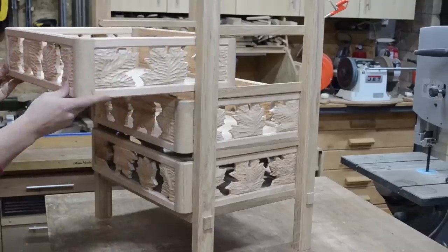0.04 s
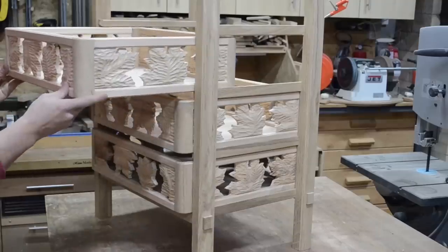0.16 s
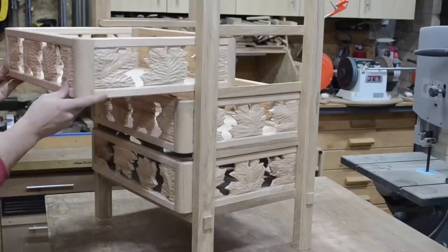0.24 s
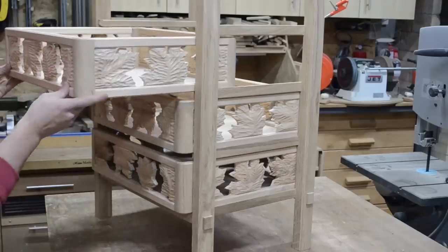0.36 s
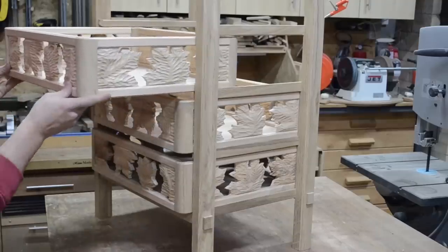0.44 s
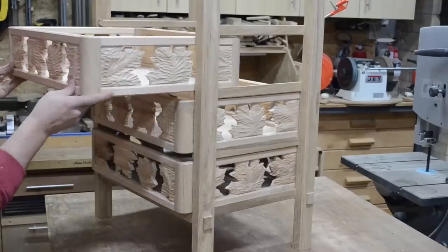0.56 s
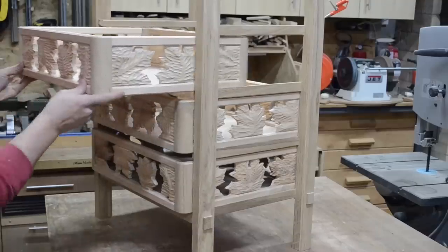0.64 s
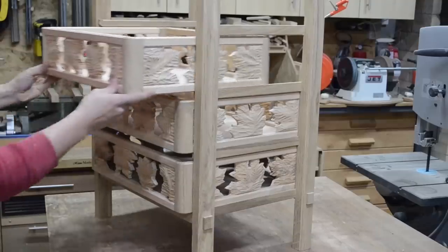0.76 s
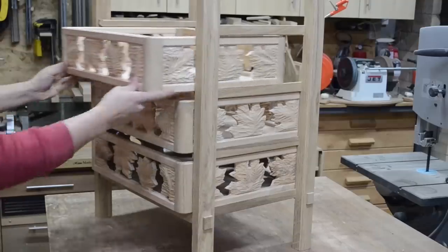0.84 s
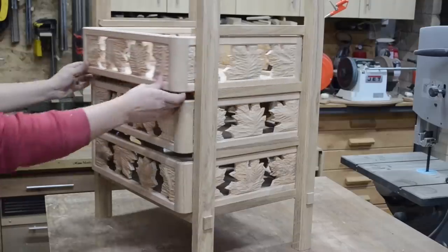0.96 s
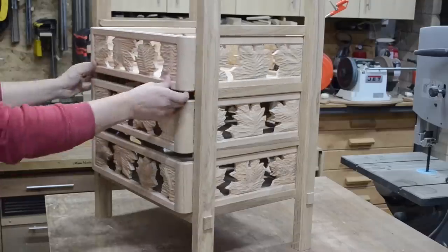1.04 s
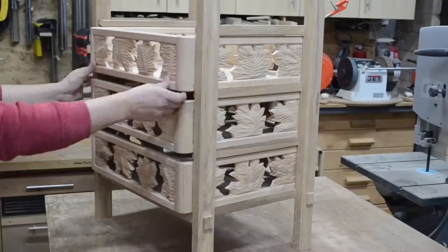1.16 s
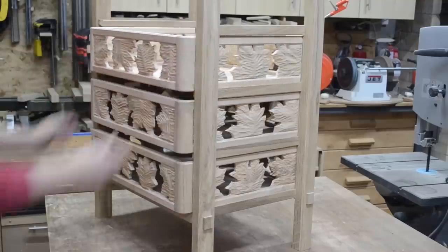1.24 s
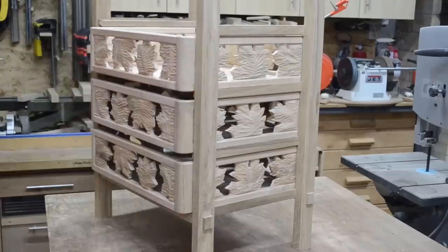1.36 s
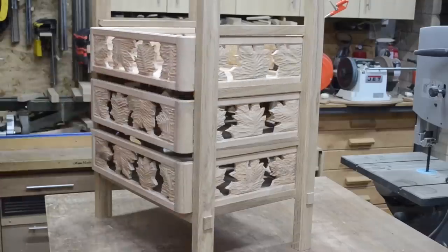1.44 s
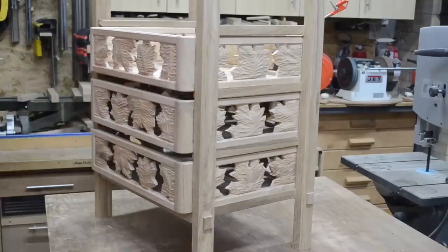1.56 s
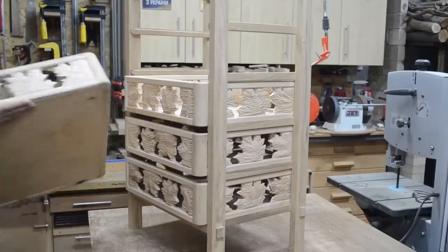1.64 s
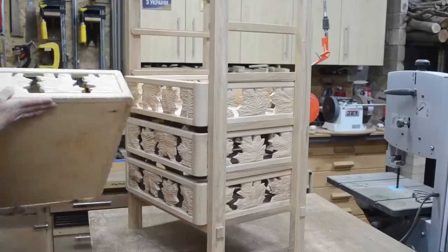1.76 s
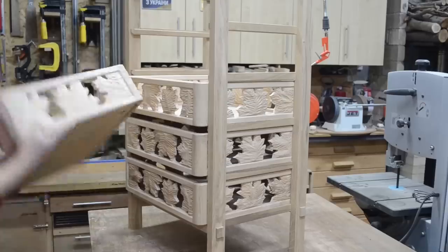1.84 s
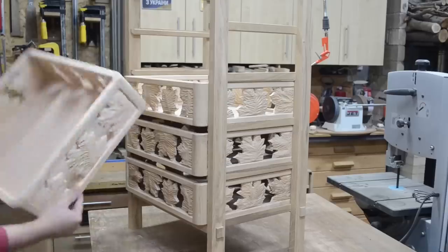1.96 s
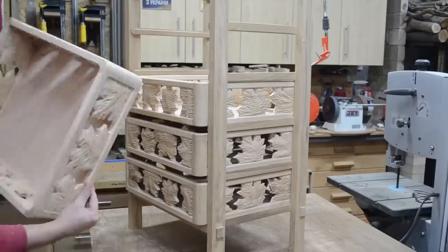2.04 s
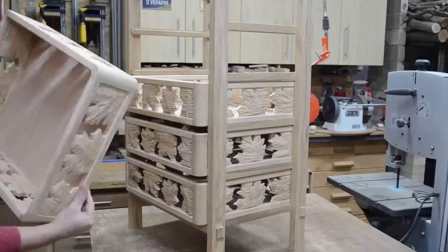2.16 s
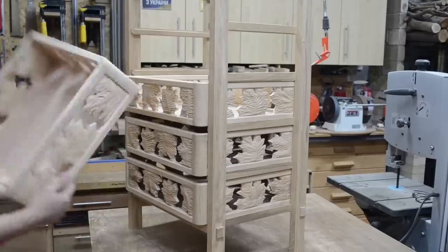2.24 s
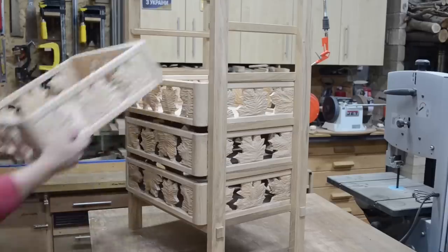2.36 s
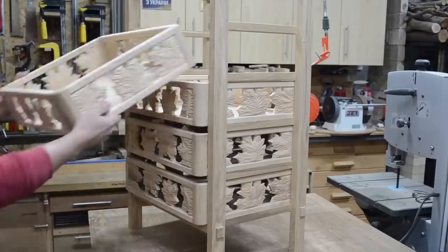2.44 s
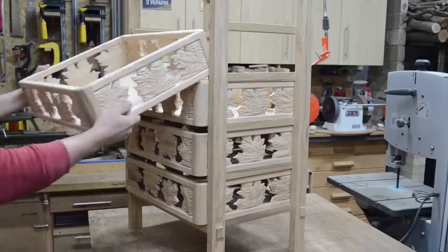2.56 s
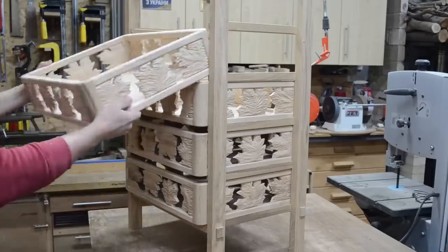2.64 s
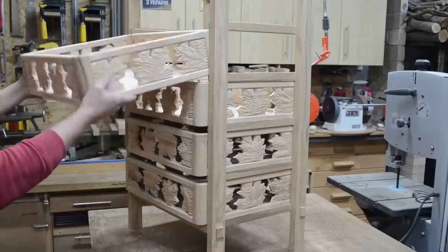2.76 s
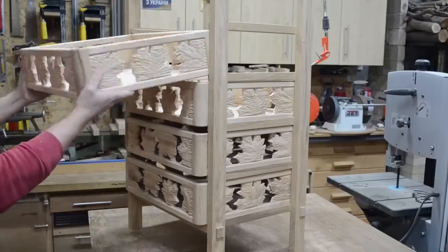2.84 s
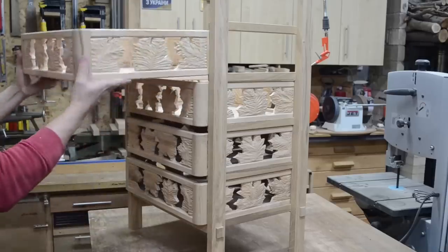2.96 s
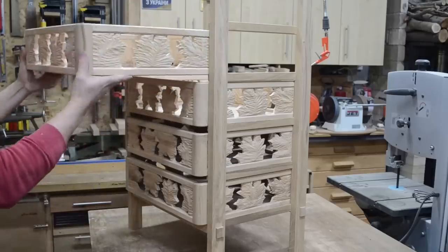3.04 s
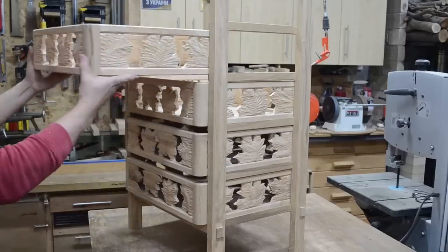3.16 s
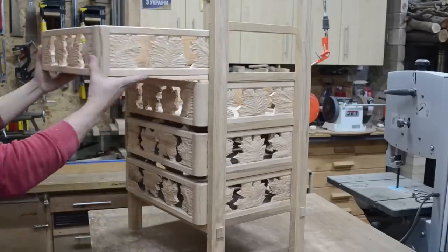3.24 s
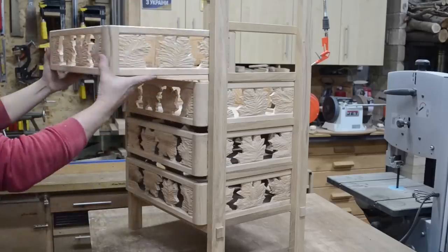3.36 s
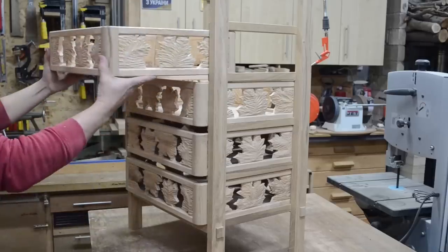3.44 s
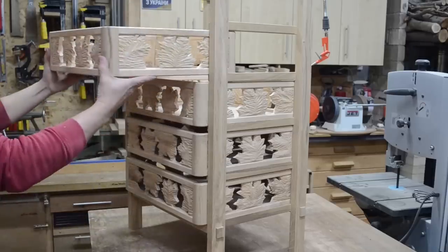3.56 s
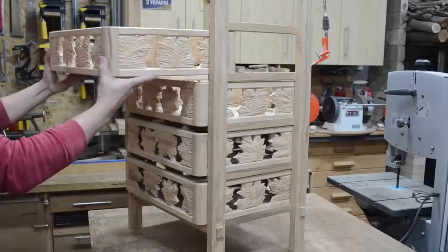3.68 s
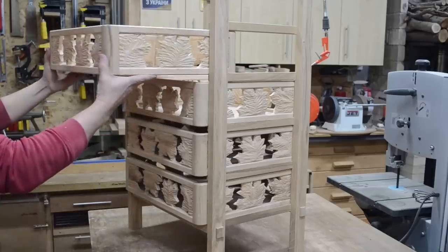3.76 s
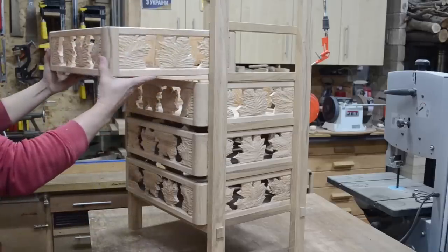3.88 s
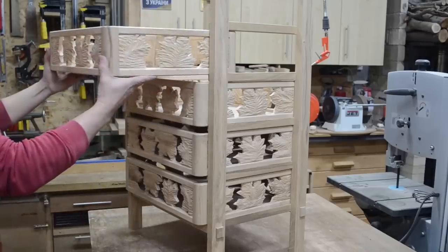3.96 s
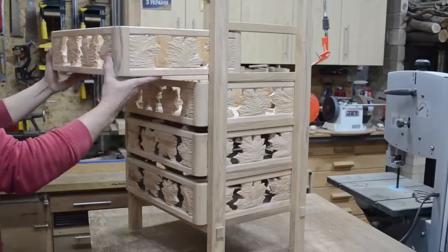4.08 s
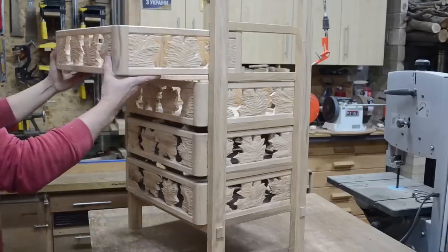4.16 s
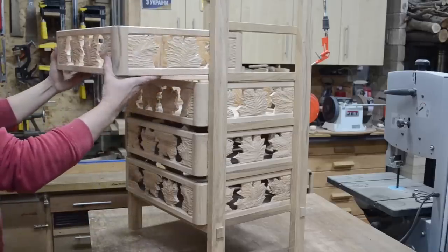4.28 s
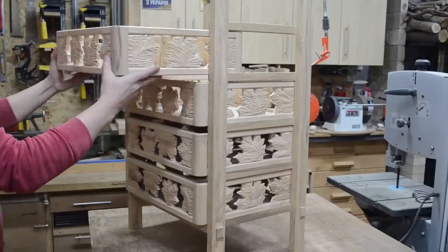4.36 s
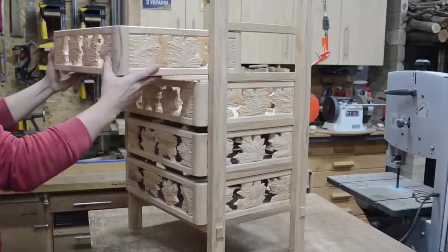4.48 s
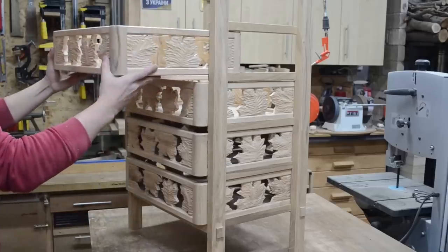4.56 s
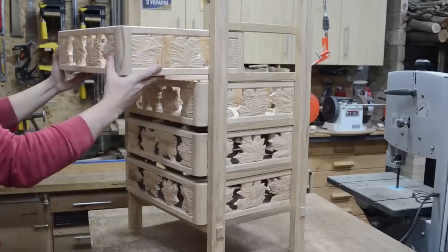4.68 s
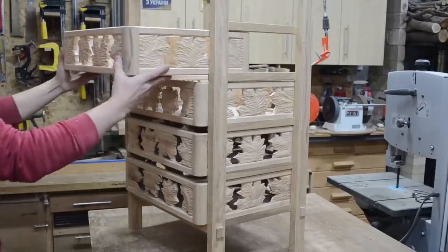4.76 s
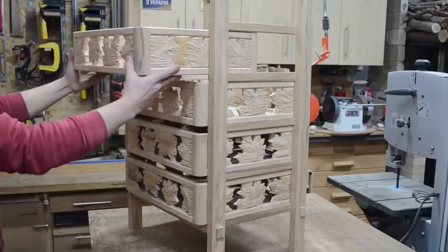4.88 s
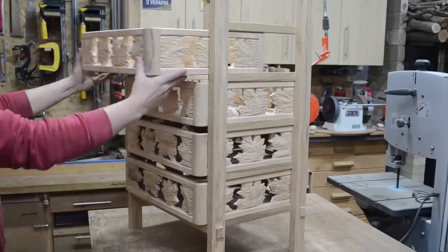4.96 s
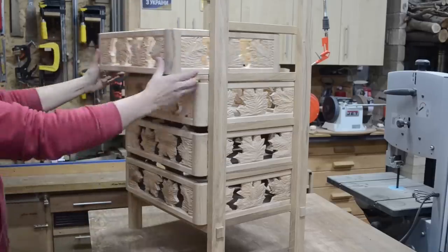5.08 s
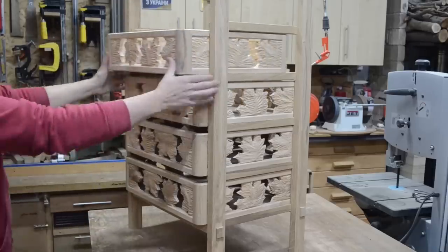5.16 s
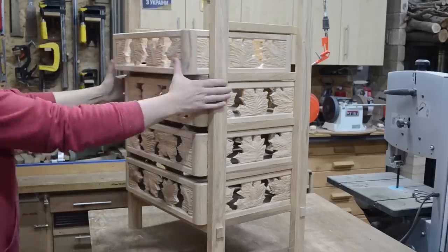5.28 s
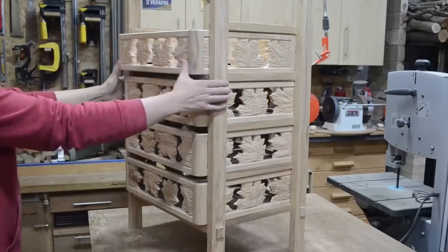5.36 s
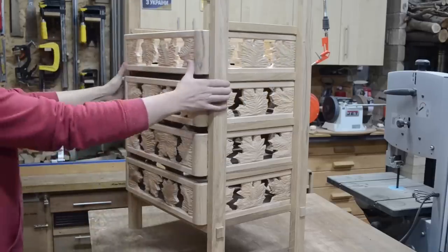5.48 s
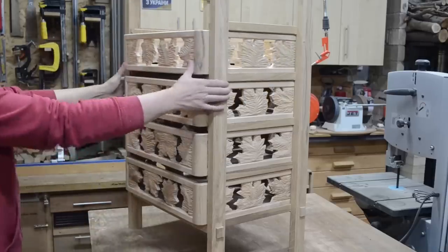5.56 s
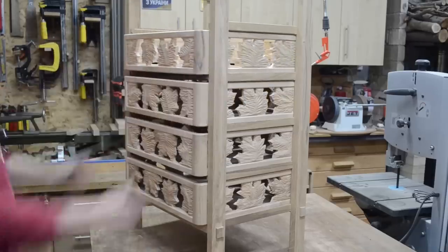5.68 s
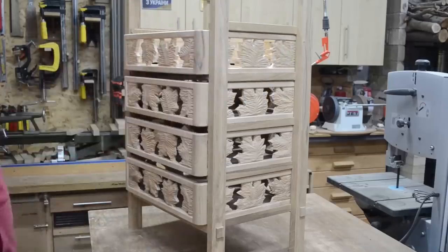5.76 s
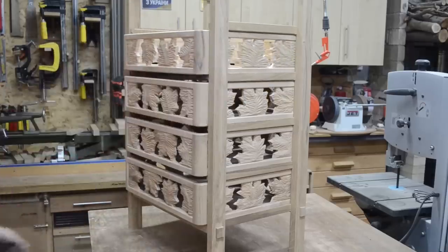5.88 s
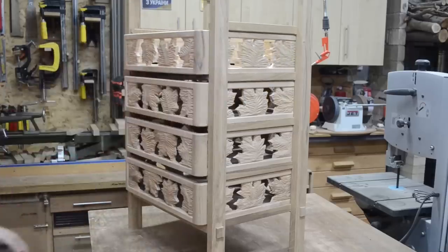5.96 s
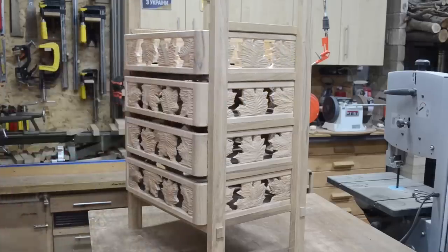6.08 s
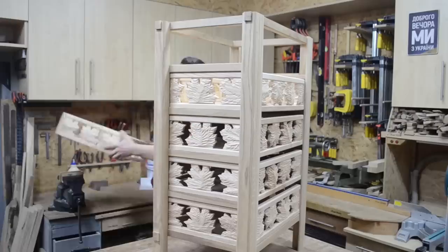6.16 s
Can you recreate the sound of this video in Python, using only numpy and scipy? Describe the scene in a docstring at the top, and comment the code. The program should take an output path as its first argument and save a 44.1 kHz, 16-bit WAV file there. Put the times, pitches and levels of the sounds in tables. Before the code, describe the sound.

In a small cluttered workshop, a light wooden drawer taps its frame, then slides in with a dry, juddering rasp and brief squeals, ending in a cluster of hollow knocks and a clack. Hands brush wood; a second drawer bumps onto the runners, scrapes, knocks, then slides harder and claps shut. Close microphone, short dull reverberation, faint steady room noise.

```python
"""In a small, cluttered workshop, two carved wooden drawers are set on the runners of a wooden frame and pushed home.
Stick-slip friction, as noise shaped by the sliding speed, makes the rasp, judder, hiss and brief squeals.
Impacts excite damped modes and a dense ring: knocks of drawer and frame, thuds, end-stop clacks, dying bounces.
Hands and sleeves brush the wood as short swells of noise; a quiet, slightly wavering room noise lies beneath."""
import sys
import numpy as np
from scipy import signal
from scipy.fft import rfft, irfft, next_fast_len
from scipy.io import wavfile

SR = 44100
rng = np.random.default_rng(int(sys.argv[2]) if len(sys.argv) > 2 else 0)


def to_wav(sig):
    """Store sig (one row per channel, or 1-D mono) as 16-bit WAV at the path in sys.argv[1].

    Samples outside -1..1 are clipped; the rate is SR.
    """
    pcm = np.clip(np.atleast_2d(sig), -1, 1) * 32767
    pcm = np.round(pcm).astype(np.int16)
    wavfile.write(sys.argv[1], SR, pcm.T)  # frames by channels


N = 274566
TIME = np.arange(N) / SR
RING_TIME = TIME[:SR // 3]  # time since a blow [s]

# Pushes along the runners, levels at full speed: (start [s], speed-up [s], hold [s], slow-down [s],
# rasp level [dB], judder level [dB], hiss level [dB], judder cut-off [Hz])
PUSHES = [(0.653, 0.23, 0.12, 0.19, -47, -48, -61.5, 170),
          (1.125, 0.008, 0.023, 0.012, -48.5, -50, -86, 200),
          (3.106, 0.23, 0.097, 0.027, -52, -55.5, -71.5, 272),
          (4.686, 0.42, 0.16, 0.094, -46, -50, -65.5, 274),
          (5.419, 0.021, 0.086, 0.017, -46, -49.5, -65.5, 274)]
# Rasp spectra, A for the first drawer, B and C for the second: (frequency [Hz], level [dB])
RASP_A = [(350, -9), (620, 1), (900, -0.5), (1100, 1), (1400, 0.5), (1850, -2.5), (2200, -7.5),
          (3000, -10.5), (3700, -18.5), (4400, -20.5), (6000, -26.5), (12000, -61)]
RASP_B = [(300, 1), (600, 3.5), (1000, -2.5), (1500, 1.5), (2000, -7), (2800, -10.5), (3700, -23),
          (5500, -35), (12000, -60)]
RASP_C = [(300, -1), (580, 1.5), (900, 0), (1250, 2.5), (1550, 1), (1900, -5), (2800, -12), (3700, -19.5),
          (5500, -31), (12000, -56)]
# Spectrum of the sliding hiss: (frequency [Hz], level [dB])
SLIDE_HISS = [(2500, 2.5), (4500, -5.5), (7000, -10), (10500, -10.5), (12500, -19), (15000, -31)]
# Gliding squeals of the first drawer:
# (middle [s], half length [s], pitch at the middle [Hz], glide [Hz/s], level [dB])
SQUEALS = [(0.79, 0.073, 1765, -500, -50.5), (0.806, 0.048, 777, -100, -46.5),
           (0.856, 0.035, 973, 2999.5, -50), (0.929, 0.11, 1448, -2000, -55),
           (0.975, 0.047, 928, -1500, -48)]
# Knocks of drawer on frame: (time [s], level [dB], contact cut-off [Hz], first frame thud re box [dB],
# first end-stop clack re box [dB], ring favoured by the struck spot [Hz])
KNOCKS = [(0.05, -54.5, 580, 0, -31, 315), (0.262, -67.5, 410, 4, -30, 260),
          (0.536, -46, 457, -7, -14, 209), (0.962, -39, 297, -6, -25, 184),
          (1.005, -39.5, 350, -8, -18, 302), (1.053, -34, 328, -10, -36, 304),
          (1.079, -39, 350, -11, -21, 250), (1.139, -35.5, 486, -3.5, -0.5, 181),
          (1.856, -51.5, 695, -13, -12, 273), (2.65, -33, 656, -2, -22, 550),
          (2.657, -33, 790, -7, -18, 440), (2.668, -33.5, 517, -12, -34, 305),
          (2.807, -47, 260, -2.5, -28, 183), (3.866, -60, 202, -6, -15, 186),
          (3.976, -53, 382, -2.5, -20, 320), (4.106, -43, 716, 3.5, -4, 348),
          (4.111, -31, 780, -12, -16.5, 650), (4.118, -33.5, 710, -21, -17.5, 236),
          (4.265, -37, 1010, -40, -26, 1000), (4.272, -42.5, 610, -6.5, -12, 354),
          (4.515, -39, 454, -9.5, -22.5, 454), (5.061, -41, 272, -6, -23, 230),
          (5.516, -39.5, 600, -25, 8, 670), (5.522, -37.5, 597, -3, -5.5, 670),
          (5.55, -34.5, 447, -13, -29, 308)]
# Modes of the drawer box: (frequency [Hz], relative level [dB], t60 [s])
BOX_MODES = [(186, 0, .19), (208, -6, .15), (231, 0, .17), (255, -3, .17), (281, -2, .15), (301, -3, .25),
             (350, -1, .16), (422, -4, .14), (458, -6, .14), (488, -2, .17), (519, -2, .17), (548, -6, .16),
             (585, -7, .13), (619, -3, .16), (680, -7, .14), (718, -6, .15), (756, -7, .14),
             (916, -10, .13), (959, -8, .13), (1010, -9, .11), (1070, -10, .11)]
# Low modes of the frame on its table: (frequency [Hz], relative level [dB], t60 [s])
FRAME_MODES = [(53.6, -16, 0.33), (69.6, -10, 0.32), (92.5, -3.5, 0.24), (111, 2, 0.14), (143.1, 3.5, 0.23)]
# Modes of the end stop and rails: (frequency [Hz], relative level [dB], t60 [s])
STOP_MODES = [(1180, -8, .15), (1291, -7, .15), (1372, 0, .16), (1420, -7, .14), (1473, 0, .16),
              (1560, -8, .14), (1776, -16, .15), (1993, -12, .14), (2370, -16, .14)]
# Dense ring of many weak modes and room reflections: (frequency [Hz], level [dB])
BOX_WASH = [(70, -30), (130, -3), (220, -5), (550, -5.5), (850, -10), (1300, -9.5), (2500, -26),
            (5000, -22), (12000, -28)]
STOP_WASH = [(300, -20), (800, -9.5), (1150, 0), (1420, 6), (1800, -5.5), (2400, -9), (3200, -20.5),
             (4000, -26.5), (5500, -44), (12000, -52.5)]
# Decay of the dense ring: (frequency [Hz], t60 [s])
WASH_T60 = [(80, 0.31), (250, 0.25), (600, 0.21), (1400, 0.15), (4000, 0.16), (12000, 0.044)]
# Hands and sleeves on wood: (middle [s], level [dB], half length [s], treble weight [dB])
BRUSHES = [(0.113, -65, 0.023, 10), (1.315, -68.5, 0.094, 2), (1.728, -60.5, 0.064, 0.5),
           (1.8, -57, 0.015, 6), (1.873, -44, 0.009, -1), (1.99, -49, 0.029, 2.5),
           (2.048, -42.5, 0.013, -2.5), (2.373, -64.5, 0.1, 1), (2.652, -60, 0.036, 0),
           (2.826, -59.5, 0.077, -0.5), (3.018, -57.5, 0.029, -11), (4.148, -54, 0.042, -2.5),
           (4.26, -51.5, 0.02, -8.5), (4.422, -60.5, 0.038, -1), (5.695, -61, 0.025, 3),
           (6.202, -61.5, 0.16, -2)]
# Spectrum of the soft rub: (frequency [Hz], level [dB])
RUB_SPECTRUM = [(150, -1), (400, 5.5), (900, 4), (1500, 4.5), (2500, -2.5), (4500, -18), (8000, -42)]
# Spectrum of the room noise: (frequency [Hz], level [dB])
ROOM_SPECTRUM = [(20, -7), (50, 0.5), (100, 0.5), (200, 1.5), (400, 0.5), (800, 2), (1600, -2),
                 (2500, -7.5), (4000, -16.5), (6300, -24.5), (10000, -26.5), (11900, -30), (12600, -48)]

# Share of full speed at which the wood breaks free or grips again, and how long that takes [s]
CREEP_SPEED, GRIP_S = 0.22, 0.013
EASE_POWER = 1.63  # above 1, the drawer picks up speed gently at first
JUDDER_POWER, HISS_POWER = 0.98, 1.14  # powers of speed; rasp is proportional to speed
SQUEAL_WIDTH_HZ = 117
# First bounce gap [s], ratio of each gap to the one before, level change per bounce [dB]
BOUNCE_S, BOUNCE_GAP_SHARE, BOUNCE_LOSS_DB = 0.024, 0.87, -12
BOUNCE_THUD_DB, BOUNCE_CLACK_DB = 2.5, -6.5  # change in thud and clack shares per bounce
ROOM_DB = -63
TOP_HZ, OFFSET = 14800, 0.0006  # upper band limit [Hz], constant offset (full scale = 1)


def push(row, rasp_spectrum):
    """Stick-slip friction: fine slips rasp and hiss, coarse slips shake the box; all follow the speed."""
    *timing, rasp_db, judder_db, hiss_db, judder_hz = row
    speed = speed_of(*timing)

    grip = undb(0.44 * walk(40))  # the grain grips unevenly
    fine = slips(per_s=6000, scatter_db=-1.0) * grip
    rasp = colour(fine, rasp_spectrum) * speed
    hiss = colour(rng.standard_normal(N), SLIDE_HISS) * speed ** HISS_POWER

    body = ring(BOX_MODES)
    body = body + undb(-2.5) * ring(FRAME_MODES)
    body = body + undb(6.5) * wash(BOX_WASH, build_s=0.0078)
    shaken = through(slips(per_s=390, scatter_db=7.5), body)
    judder = unit(low_pass(shaken, judder_hz)) * speed ** JUDDER_POWER

    return undb(rasp_db) * rasp + undb(judder_db) * judder + undb(hiss_db) * hiss


def speed_of(start, rise_s, hold_s, fall_s):
    """Static and sliding friction: break free, speed up, run evenly, slow, grip again (1 = full speed)."""
    times = start - GRIP_S + np.cumsum([0, GRIP_S, rise_s, hold_s, fall_s, GRIP_S])
    creep = CREEP_SPEED ** (1 / EASE_POWER)
    return np.interp(TIME, times, [0, creep, 1, 1, creep, 0]) ** EASE_POWER


def slips(per_s, scatter_db):
    """Stick-slip at fibre scale: wood fibres catch and let go in random tiny impulses of uneven size."""
    happens = rng.random(N) < per_s / SR
    unevenness = undb(scatter_db * rng.standard_normal(N))
    return unit(happens * rng.standard_normal(N) * unevenness)


def squeal(s, half_s, hz, glide_hz_per_s, db):
    """Friction-driven resonance: a narrow band whose pitch glides as the point of contact moves."""
    phase = 2 * np.pi * np.cumsum(hz + glide_hz_per_s * (TIME - s)) / SR
    # slow noise on two quadrature carriers makes a band centred on the gliding pitch
    slipping = low_pass(rng.standard_normal((2, N)), SQUEAL_WIDTH_HZ / 2)
    tone = unit(slipping[0] * np.cos(phase) + slipping[1] * np.sin(phase))
    return undb(db) * tone * swell(s, half_s)


def knocks(bounces=2):
    """Energy loss in repeated impact: after each blow the bounces come sooner and weaker."""
    out = np.zeros(N)
    for s, db, contact_hz, thud_db, clack_db, spot_hz in KNOCKS:
        for k in range(bounces + 1):
            bounce_thud_db = thud_db + k * BOUNCE_THUD_DB
            bounce_clack_db = clack_db + k * BOUNCE_CLACK_DB
            sound = blow(contact_hz, bounce_thud_db, bounce_clack_db, spot_hz)
            add(out, s, undb(db + k * BOUNCE_LOSS_DB) * sound)
            s += BOUNCE_S * BOUNCE_GAP_SHARE ** k
    return out


def blow(contact_hz, thud_db, clack_db, spot_hz):
    """Impact excitation: softer contact dulls the box ring; the frame thuds and the hard stop clacks."""
    modes = favour(BOX_MODES, spot_hz, boost_db=7.5, width_octaves=0.12)
    box = ring(modes) + undb(-5.5) * wash(BOX_WASH, build_s=0.0036)
    box = box * (1 - np.exp(-RING_TIME / 0.0036))  # the ring spreads through the joints
    box = box + undb(5) * crack(BOX_WASH, length_s=0.0046)
    box = unit_hit(low_pass(box, contact_hz))

    thud = ring(FRAME_MODES) * (1 - np.exp(-RING_TIME / 0.0097))  # the heavy frame builds up later

    clack = ring(STOP_MODES) + undb(7.5) * wash(STOP_WASH, build_s=0.0026)
    clack = unit_hit(clack + undb(10) * crack(STOP_WASH, length_s=0.0038))
    return box + undb(thud_db) * thud + undb(clack_db) * clack


def favour(modes, centre_hz, boost_db, width_octaves):
    """Modal coupling: a blow drives hardest the modes that move most at the struck spot."""
    favoured = []
    for hz, db, t60 in modes:
        octaves_away = np.log2(hz / centre_hz)
        boost = boost_db * np.exp(-(octaves_away / width_octaves) ** 2)
        favoured.append((hz, db + boost, t60))
    return favoured


def ring(modes):
    """Modal superposition: a struck body sounds as a sum of damped sine modes."""
    total = np.zeros(len(RING_TIME))
    for k, (hz, db, t60) in enumerate(modes):
        sign = (-1) ** k  # neighbouring modes move in opposite phase
        total += sign * undb(db) * fade(t60) * np.sin(2 * np.pi * hz * RING_TIME)
    return unit_hit(total)


def wash(spectrum, build_s):
    """High modal density: a noise-like ring builds up quickly and decays at a rate set by frequency."""
    bins = rfft(colour(rng.standard_normal(len(RING_TIME)), spectrum))
    hz = np.fft.rfftfreq(len(RING_TIME), 1 / SR)
    centres, t60s = np.transpose(WASH_T60)
    tail = np.zeros(len(RING_TIME))
    for share, t60 in zip(np.eye(len(centres)), t60s):
        # overlapping bands, each rising from 0 to 1 at its own centre
        weight = at_hz(np.c_[centres, share], hz)
        tail += irfft(bins * weight, len(RING_TIME)) * fade(t60)
    return unit_hit(tail * (1 - np.exp(-RING_TIME / build_s)))


def crack(spectrum, length_s):
    """Direct radiation: the first few milliseconds reach the ear straight from the contact."""
    pulse = (RING_TIME / length_s) * np.exp(1 - RING_TIME / length_s)
    return colour(rng.standard_normal(len(RING_TIME)), spectrum) * pulse


def fade(t60):
    """Damping: decay of 60 dB in t60 seconds, held up at first by early reflections."""
    return np.exp(-np.log(1000) * (RING_TIME / t60) ** 1.35)


def brushes():
    """Light surface friction: skin and cloth sweep the wood in short swells of soft rub and fine hiss."""
    rub_gain, hiss_gain = np.zeros(N), np.zeros(N)
    for s, db, half_s, treble_db in BRUSHES:
        sweep = undb(db) * swell(s, half_s)
        rub_gain += sweep
        hiss_gain += sweep * undb(treble_db)
    rub = rub_gain * colour(slips(per_s=12000, scatter_db=-2.0), RUB_SPECTRUM)
    # (frequency [Hz], level [dB])
    hiss_spectrum = [(2000, 16.5), (4000, 6.5), (7000, 2.5), (11000, 2.0), (13000, -8), (15000, -19)]
    hiss = hiss_gain * colour(rng.standard_normal(N), hiss_spectrum)
    return rub + undb(-9.5) * hiss


def swell(s, half_s):
    """Amplitude envelope: a rounded rise and fall about time s."""
    return np.exp(-np.abs((TIME - s) / half_s) ** 1.23)


def workshop(x, t60, wet_db):
    """Reverberation: benches and walls return a short, dull tail, modelled as decaying noise."""
    spectrum = [(60, -1.0), (2000, -3.5), (6000, -9), (14000, -5.5)]  # (frequency [Hz], level [dB])
    tail = colour(rng.standard_normal(len(RING_TIME)), spectrum) * fade(t60)
    tail = tail * (RING_TIME > 0.004)  # reflections arrive after 4 ms
    tail = tail / np.sqrt(np.sum(tail ** 2))
    return x + undb(wet_db) * through(x, tail)


def room_noise():
    """Stationary coloured noise: a background whose level wavers a little."""
    level = undb(ROOM_DB + 0.5 * walk(22))
    return level * colour(rng.standard_normal(N), ROOM_SPECTRUM)


def walk(rate):
    """Slow random modulation: chance values, rate per second, joined by straight lines; spread near 1."""
    knots = rng.standard_normal(1024)
    return np.interp(TIME * rate, np.arange(len(knots)), knots)


def colour(x, spectrum):
    """Spectral shaping: weight by (Hz, dB) points, falling steeply below the first, and set rms to 1."""
    size = next_fast_len(len(x), True)
    hz = np.fft.rfftfreq(size, 1 / SR)
    bass_fall = np.minimum(hz / spectrum[0][0], 1) ** 2
    gain = undb(at_hz(spectrum, hz)) * bass_fall
    return unit(irfft(rfft(x, size) * gain, size)[:len(x)])


def at_hz(table, hz):
    """Logarithmic frequency scale: interpolate (Hz, value) points along it."""
    points, values = np.transpose(table)
    return np.interp(np.log(hz + 1e-9), np.log(points), values)


def low_pass(x, cutoff_hz):
    """Low-pass filtering: second-order Butterworth roll-off above the cut-off."""
    return signal.sosfilt(signal.butter(2, cutoff_hz, fs=SR, output="sos"), x)


def through(x, response):
    """Linear response by convolution: play a signal through an impulse response."""
    return signal.fftconvolve(x, response)[:N]


def add(out, s, sound):
    """Superposition: mix a sound in at time s."""
    start = int(s * SR)
    out[start:start + len(sound)] += sound[:N - start]


def undb(db):
    """Decibel law: level to amplitude gain."""
    return 10 ** (np.asarray(db) / 20)


def unit(x):
    """Effective value: scale to rms 1."""
    return x / np.sqrt(np.mean(x ** 2))


def unit_hit(x):
    """Effective value of an onset: scale a ring to rms 1 over its first 25 ms."""
    return x / np.sqrt(np.mean(x[:SR // 40] ** 2))


def scene():
    """Superposed sources: one drawer slides in and grinds into the stop, the second takes three pushes."""
    rasps = (RASP_A, RASP_A, RASP_B, RASP_C, RASP_C)
    sliding = sum(push(row, rasp) for row, rasp in zip(PUSHES, rasps))
    sliding += sum(squeal(*row) for row in SQUEALS)
    friction = workshop(sliding + brushes(), t60=0.23, wet_db=-11.5)
    return (friction + knocks() + room_noise())[None]


def record(dry):
    """Band limiting: a steep elliptic low-pass cuts the top, and the signal rests slightly off zero."""
    top_cut = signal.ellip(8, 0.2, 70, TOP_HZ, fs=SR, output="sos")  # 0.2 dB ripple, 70 dB stop band
    return signal.sosfilt(top_cut, dry) + OFFSET


dry = scene()
out = record(dry)
to_wav(out)
```